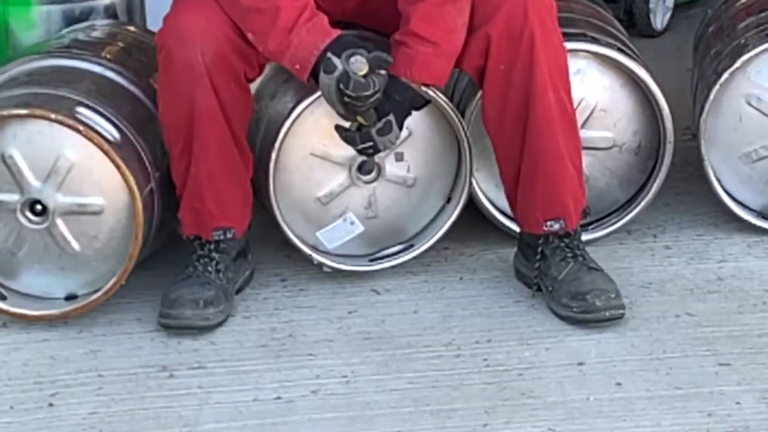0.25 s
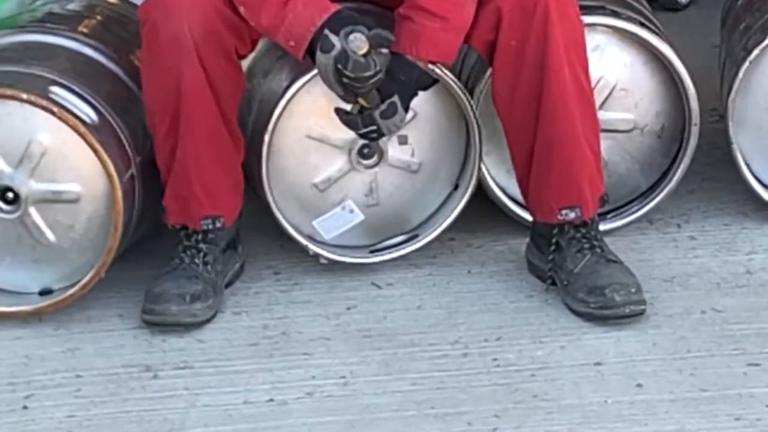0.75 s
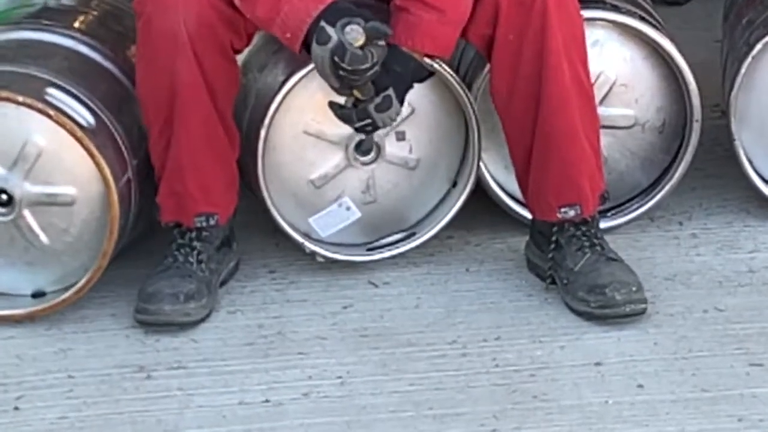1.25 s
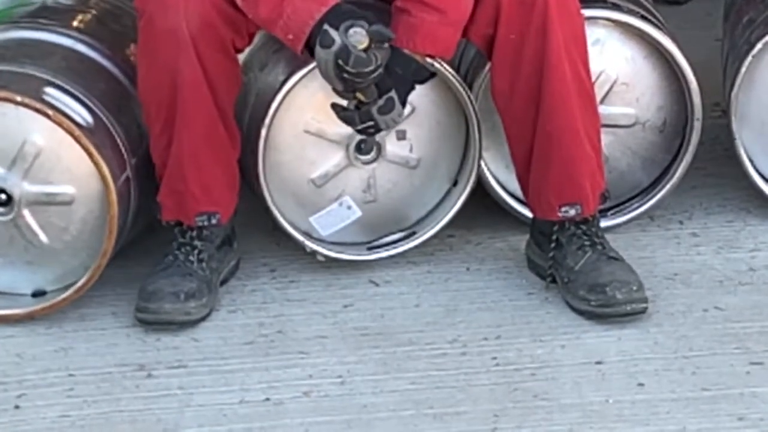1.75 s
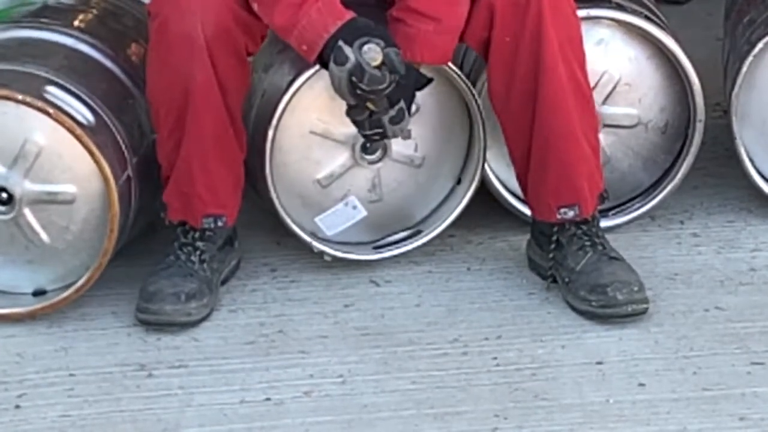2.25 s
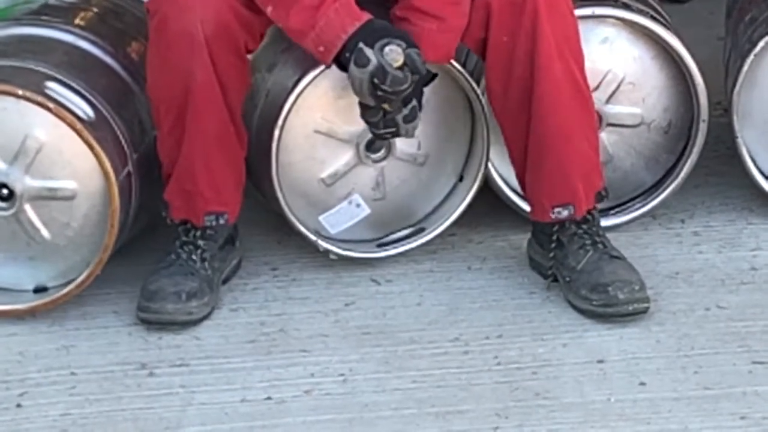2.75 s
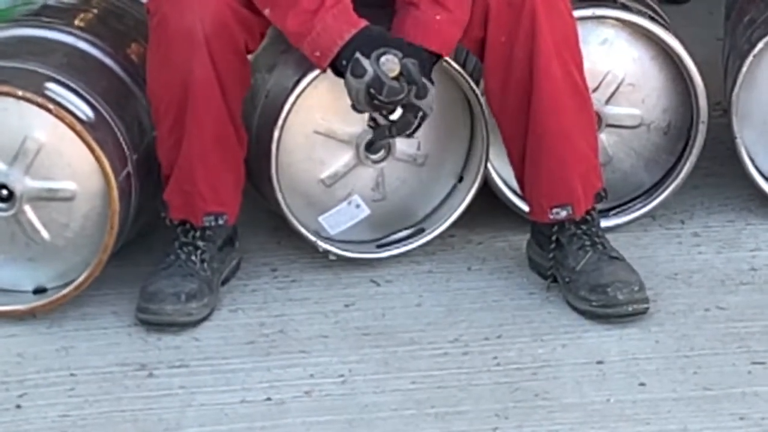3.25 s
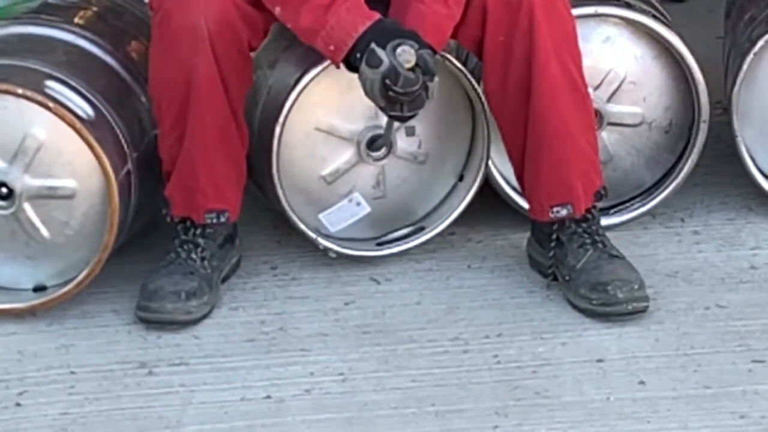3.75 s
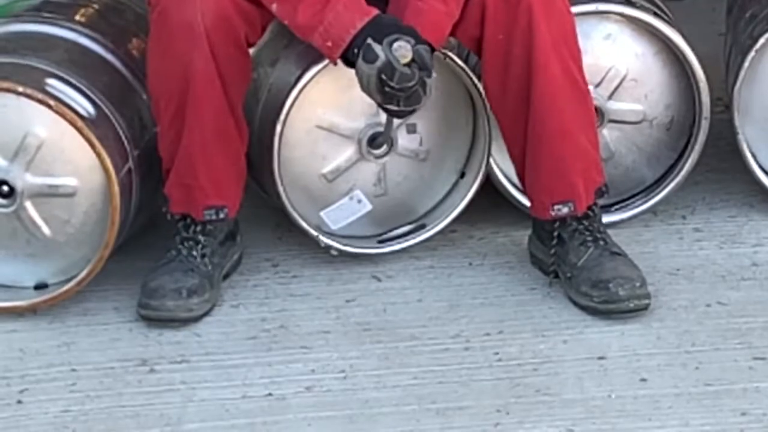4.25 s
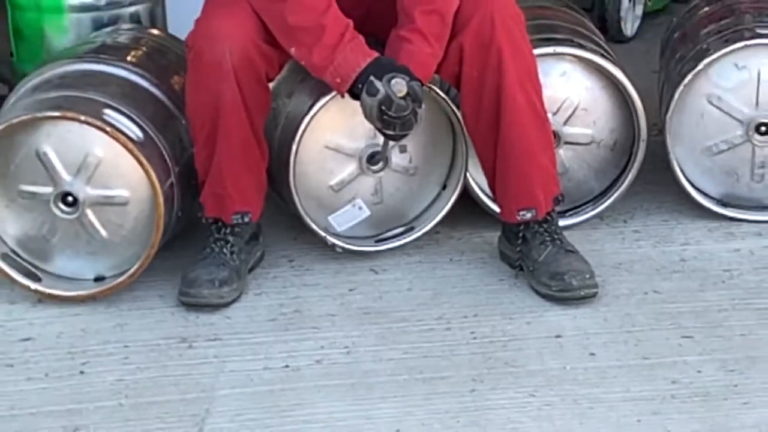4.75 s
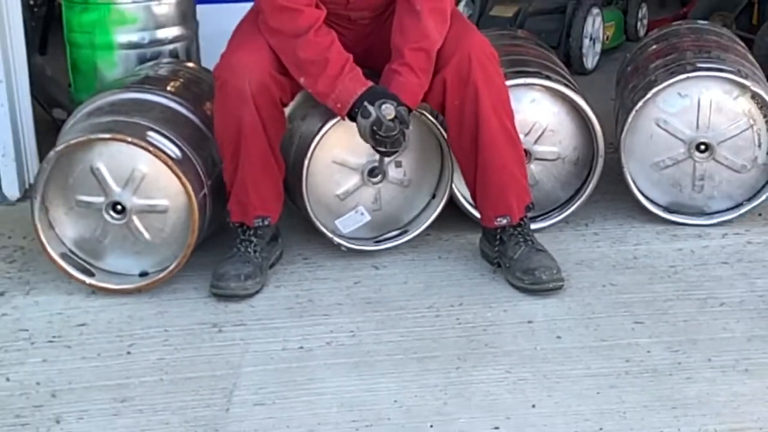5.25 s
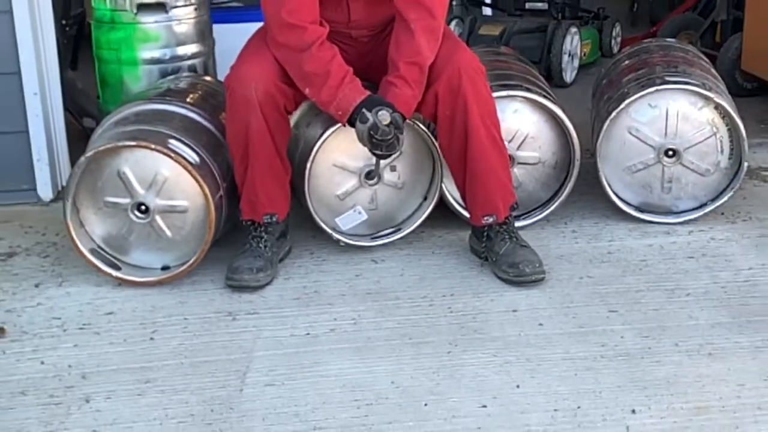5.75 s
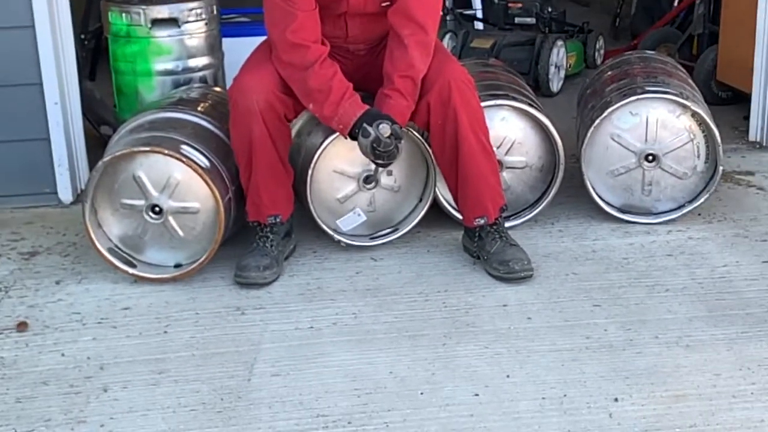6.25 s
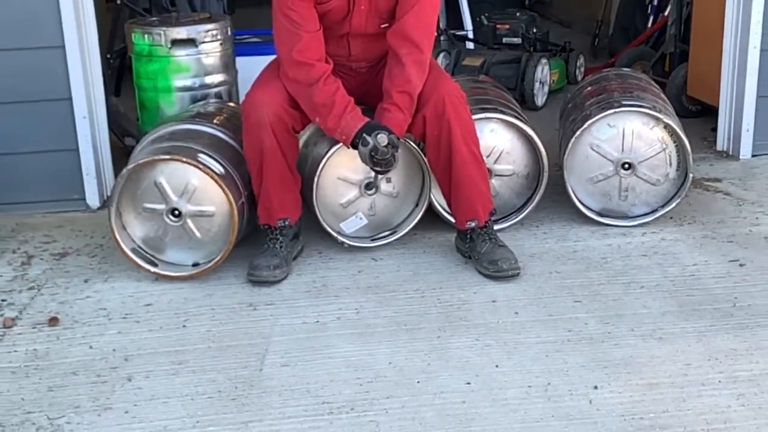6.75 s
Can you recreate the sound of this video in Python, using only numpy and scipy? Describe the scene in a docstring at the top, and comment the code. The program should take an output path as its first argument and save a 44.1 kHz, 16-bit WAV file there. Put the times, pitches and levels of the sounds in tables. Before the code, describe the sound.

A tool knocks on a steel keg valve and gas sputters, then bursts into a loud hiss that slowly fades.

```python
"""A tool knocks on the valve of a steel keg, over the low hum and rumble of a workshop yard.
Each blow rings the modes of the shell, and short puffs of gas escape. Then the valve stays open:
a turbulent jet hisses, coloured by the hollows of the rim and fading as the pressure runs out.
The hiss changes colour, slowly at first, then abruptly. A two-port microphone stands a few metres
away and takes a few soft bumps on its body."""
import sys
import numpy as np
from scipy import signal
from scipy.fft import rfft, irfft
from scipy.io import wavfile
from scipy.ndimage import uniform_filter1d

SR = 44100
rng = np.random.default_rng(int(sys.argv[2]) if len(sys.argv) > 2 else 0)


def persist_wave(psi):
    """Save psi, clipped to +-1, as 16-bit WAV."""
    counts = np.round(np.clip(psi, -1, 1) * 32767).astype(np.int16)
    wavfile.write(sys.argv[1], SR, np.atleast_2d(counts).T)


N = 308259
TIME = np.arange(N) / SR
AGE = np.arange(SR) / SR  # the second after an event starts
FREQ = np.arange(N // 2 + 1) * SR / N  # f/Hz of each spectral bin
OPENS_S, OPEN_RISE_S = 2.5115, 0.0082  # the valve opens and stays open


def gas():
    """Source and filter: turbulence makes broadband noise, and the resonances of the keg colour it."""
    # early and late hiss spectrum: f/Hz, spectral level/dB
    early_spectrum = [(200, -24.5), (380, -26), (760, -13.5), (1230, -27.5), (1900, -14.5), (4250, -4),
                      (5000, -12.5), (6100, -13), (6600, -2.5), (7700, -4.5), (9200, 1), (12000, -5),
                      (13800, -3.5), (15300, -5)]
    late_spectrum = [(200, -43), (380, -34.5), (760, -16), (1230, -26), (2100, -19), (4000, -9.5),
                     (5600, -25), (6600, -13), (7800, -13.5), (8150, -3.5), (9000, 1.5), (12000, -7),
                     (13800, -5.5), (15300, -6.5)]
    # the hiss changes colour, 4-8 kHz dropping abruptly at 5.24 s: t/s, share of the late spectrum (0-1)
    colour_change = [(2.5, 0), (3.05, 0), (3.15, .15), (3.9, .3), (5.2, .55), (5.24, 1), (6.7, 1),
                     (6.8, .8)]
    late, = curves(colour_change)
    flow_power = open_jet()
    puff_power = puffs()
    seep_power = np.array([[undb(-80.5) ** 2], [0]])  # faint steady leak, treble only
    treble, rim = np.sqrt(flow_power + puff_power + seal_burst() + seep_power)
    shell_drive = np.sqrt(puff_power[1])
    rim_top_hz = 5800
    low = 1 / (1 + (FREQ / rim_top_hz) ** 8)  # crossover from rim band to treble band
    spectra = []
    for noise in rng.standard_normal((2, N)):
        hiss = 0
        for colour, share in ((early_spectrum, 1 - late), (late_spectrum, late)):
            bands = low * rfft(noise * rim * share) + (1 - low) * rfft(noise * treble * share)
            hiss += shape(colour) * bands
        spectra.append(rim_response() * hiss + shell_response() * rfft(noise * shell_drive))
    return ports(*spectra)


def open_jet():
    """Jet noise weakens as the driving pressure falls. Returns power in the treble and rim bands."""
    # outflow of the open valve: t/s, jet level/dB, rim level/dB relative to the jet
    outflow = [(2.55, -20, -0.5), (2.66, -18, -3.5), (3.03, -18.5, -2.5), (3.09, -20.5, -3.5),
               (3.41, -23, -2.5), (3.88, -22, -4), (4.68, -25, -3.5), (4.86, -27, -2), (5.2, -27, -3),
               (5.44, -30.5, -1.5), (5.99, -29.5, -2), (6.1, -29, -2.5), (6.47, -35.5, 1),
               (6.94, -38.5, 1.5), (6.99, -42, 5)]
    # brief swells of the treble: t/s, lift/dB
    surges = [(3.51, 0.5), (3.93, 3.5), (4.7, 2.5), (5.12, 2.5), (6.06, 2), (6.4, 2)]
    jet_db, rim_db = curves(outflow)
    surge_db = sum(db * bell(s, 0.029) for s, db in surges) + 1.06 * walk(14)
    opening = np.clip((TIME - OPENS_S) / OPEN_RISE_S, 0, 1) ** 2
    flow = undb(jet_db + 0.53 * walk(9) + 0.51 * walk(120)) * opening
    return (flow * undb([surge_db, rim_db])) ** 2


def puffs():
    """Transient outflow: the seal snaps open, then leaks. Returns power in the treble and rim bands."""
    # escapes of gas: t/s, level/dB, relative rim level/dB, relative leak level/dB, slope/(dB per 0.1 s)
    escapes = [(0.2144, -62, 11, 2, -22), (0.372, -36.5, 1.5, 3, -21), (0.396, -27.5, 2.5, -5.5, -17),
               (0.6524, -61, 8, 9, -14), (0.699, -45.5, 8.5, -6, -21), (0.899, -58.5, 1, 1, -22),
               (1.094, -49, -2, 3, -22), (1.108, -39.5, 0, -0.5, -25), (1.224, -59, 8, -1, -22),
               (1.397, -45.5, 12, -11, -7), (1.476, -35, 2.5, 0, -21.5), (1.877, -49.5, 1, -1.5, -19),
               (1.981, -35, 7, 2.5, -15), (2.0347, -48, 3.5, -0.5, -16), (2.0994, -46, 5.5, 1, -8.5),
               (2.218, -23.5, 0, -10.5, -11), (2.2677, -16, 3.5, -9, -10.5), (2.4463, -23, 3.5, -8, -3),
               (2.461, -28, 7.5, -12, -21)]
    sputters = [(when * OPENS_S, -66 + 5 * (2 * size - 1), 4, 1.5, -20)
                for when, size in rng.random((7, 2))]  # faint puffs at random moments
    crest_db = 10  # noise peaks stand above the envelope
    power = np.zeros((2, N))
    for s, db, rim_db, leak_db, slope_db in escapes + sputters:
        leak = undb(leak_db + slope_db * AGE / 0.1) * (1 - np.exp(-AGE / 0.003))
        puff = undb(db - crest_db) * (fall(t60=0.054, rise_s=0.00044) + leak)
        add(power[0], s, puff ** 2)
        add(power[1], s, (puff * undb(rim_db)) ** 2)
    return power


def seal_burst():
    """Sudden pressure release as the seal gives way. Returns power in the treble and rim bands."""
    burst = undb(-4) * fall(t60=0.19, rise_s=OPEN_RISE_S) * np.clip(AGE / OPEN_RISE_S, 0, 1)
    power = np.zeros((2, N))
    add(power[0], OPENS_S, burst ** 2)
    add(power[1], OPENS_S, (burst * undb(-5)) ** 2)
    return power


def rim_response():
    """Cavity resonance: the hollows of the rim ring with the jet and cancel it in between."""
    # peaks and notches: f/Hz, width/Hz, gain/dB
    hollows = [(1420, 98, 10.5), (1864, 150, 4.5), (2094, 93, 10), (2357, 99, -9), (2392, 90, 12.5),
               (2590, 52, -14), (3075, 79, 9), (3034, 62, -20), (3090, 640, 2.5), (3390, 53, -22),
               (3400, 95, 2.5), (4120, 79, 0), (4720, 480, 4), (6430, 26, 6), (5900, 110, 6.5),
               (6720, 26, 8.5), (7000, 43, 5.5), (6850, 89, -5.5), (7200, 72, -9.5)]
    return undb(sum(db / (1 + (2 * (FREQ - hz) / width) ** 2) for hz, width, db in hollows))


def shell_response():
    """Sympathetic vibration: the shell sings in narrow bands along with the puffs."""
    # shell resonances: f/Hz, width/Hz, level/dB
    resonances = [(1122, 34, -22.5), (1380, 80, -20.5), (3320, 37, -24), (4120, 90, -25.5)]
    return sum(undb(db) * shape([(1, -80), (hz - 3 * width, -30), (hz - width / 2, -3),
                                 (hz + width / 2, -3), (hz + 3 * width, -30), (SR, -80)])
               for hz, width, db in resonances)


def knocks():
    """Impact excitation: a thud, the damped modes of the keg, a crack and a rattle between the kegs."""
    # tool on the valve: t/s, level/dB, thud f/Hz, relative clank level/dB
    blows = [(0.174, -39, 535, -3), (0.667, -34.5, 258, -5.5), (1.375, -24, 197, -13.5),
             (1.602, -37, 504, -5.5), (2.039, -32, 180, -10)]
    # modes of the keg: f/Hz, level/dB, T60/s
    modes = [(283, 0.5, 0.17), (362, -6, 0.12), (488, -4, 0.3), (637, -17, 0.065), (1324, -11, 0.31),
             (1900, -14, 0.28), (2523, -20.5, 0.71), (3320, -13, 0.13), (3600, -35, 0.083),
             (4100, -11, 0.055)]
    tones, rattle = np.zeros((2, N))
    scatter = rng.standard_normal((len(blows), 2, len(modes)))
    rattle_decay = fall(t60=0.029, rise_s=0.00039) + undb(-6.5) * fall(0.46) + undb(-24) * fall(1.2)
    for (s, db, thud_hz, clank_db), (sizes, detunes) in zip(blows, scatter):
        add(tones, s, undb(db) * fall(t60=0.04, rise_s=0.00084) * sine(thud_hz))
        for (hz, mode_db, t60), size, detune in zip(modes, sizes, detunes):
            # the dented shell splits every mode into a beating pair
            pair = sum(sine(hz * (1 + split + 0.012 * detune)) for split in (-0.012, 0.012)) / 2
            add(tones, s, undb(db + clank_db + mode_db + 3 * size) * fall(t60, rise_s=0.0004) * pair)
        add(rattle, s - 0.001, undb(db + clank_db - 3.5) * rattle_decay)
    colour = shape([(200, -6), (600, 18), (1500, -4), (3500, 2.5), (5200, -18), (12000, -28)])
    direct, stray = (colour * rfft(rattle * noise) for noise in rng.standard_normal((2, N)))
    return ports(rfft(tones) + direct, rfft(tones) + stray)


def bumps():
    """Structure-borne sound: damped swings of the microphone housing and a scuff, alike in both ports."""
    # soft bumps on the housing: t/s, level/dB, f/Hz, T60/s
    touches = [(4.2, -55, 70, 0.15), (4.597, -56, 69.5, 0.2), (4.986, -49.5, 70, 0.2),
               (5.061, -48, 72, 0.14), (5.508, -55, 70, 0.2), (5.625, -48, 72, 0.15),
               (5.7, -54, 70.4, 0.24), (5.789, -51, 70, 0.15), (6, -46.5, 70, 0.15), (6.261, -58, 71, 0.31),
               (6.949, -55, 70, 0.2)]
    swings, scuff = np.zeros((2, N))
    for s, db, hz, t60 in touches:
        add(swings, s, undb(db) * fall(t60, rise_s=0.0015) * sine(hz))
        add(scuff, s, undb(db - 4) * fall(t60=0.14, rise_s=0.00088))
    colour = shape([(50, -20), (120, 6), (300, -5.5), (450, -38), (1200, -88)])
    return swings + irfft(colour * rfft(scuff * rng.standard_normal(N)), N)


def yard():
    """Ambient field of rumble, rush and hum; the noise is coherent left and right only in the bass."""
    # low rumble and broad rush: f/Hz, spectral level/dB
    rumble_spectrum = [(22, -30), (40, -11), (52, -3), (63, 0), (78, -3), (92, -14), (125, -36),
                       (250, -130)]
    rush_spectrum = [(90, 3), (140, 0.5), (210, -0.5), (330, -12), (610, -17.5), (950, -19.5), (1500, -24),
                     (2200, -32.5), (2900, -36), (5000, -46.5)]
    # the yard sinks away once the jet blows and creeps back: t/s, gain/dB
    sinking = [(2.54, 2), (2.61, -19), (3.1, -33), (4.85, -31.5), (5.3, -24.5), (6.99, -20)]
    # swells of the rumble: t/s, lift/dB, half length/s
    swells = [(.17, 3, .05), (0.391, 13, 0.029), (0.618, 13.5, 0.025), (0.673, 8, .025), (1.04, 11.5, .06),
              (2.525, 8, 0.027), (5.092, 21, 0.062)]
    sink_db, = curves(sinking)
    apart = np.clip(0.19 + FREQ / 1300, 0, 1) * np.array([[1], [-1]])
    rumble_noise, rush_noise = (mid + apart * side for mid, side in rfft(rng.standard_normal((2, 2, N))))
    rumble = irfft(shape(rumble_spectrum) * rumble_noise, N)
    rush = irfft(shape(rush_spectrum + [(9000, -80)]) * rush_noise, N)  # distance takes the treble away
    # dividing by the running rms evens out the rumble
    rumble /= np.sqrt(0.05 + uniform_filter1d(rumble.mean(axis=0) ** 2, size=SR // 20))
    swell_db = sum(db * bell(s, half_s) for s, db, half_s in swells)
    drone = hum() * undb(0.17 * sink_db)  # the hum sinks further than the rest
    rumble *= undb(-50 + swell_db + 2.6 * walk(14))
    rush *= undb(-47.5 + 0.77 * walk(6.1))
    return undb(sink_db) * (rumble + drone + rush)


def hum():
    """Random modulation of frequency and amplitude makes a low tone waver."""
    # the hum comes and goes: t/s, level/dB
    levels = [(0.0, -85), (0.07, -53), (0.17, -41.5), (0.36, -55.5), (0.46, -43), (0.7, -50), (0.72, -42.5),
              (1.11, -43), (1.19, -58), (1.28, -45.5), (1.78, -59), (1.81, -45), (2.05, -51), (2.16, -44),
              (2.48, -57.5), (2.5, -48.5)]
    level_db, = curves(levels)
    centre_hz, waver_hz = 110, 5.28
    phase = 2 * np.pi * np.cumsum(centre_hz + waver_hz * walk(14)) / SR
    port_phase = np.array([[0.3], [-0.3]]) * walk(6)
    return np.sqrt(2) * np.sin(phase + port_phase) * undb(level_db + 2 * walk(20))


def ports(direct, stray):
    """Partial coherence: left hears the direct spectrum, right a phase-shifted copy plus stray sound."""
    # right port against left: f/Hz, phase lead/rad, coherence (0-1), level/dB
    transfer = [(0, 0, .97, -.5), (1700, -.2, .85, -1), (2300, -1.2, .55, 0), (3800, -1.3, .55, -1),
                (4150, 0, .95, -1), (4550, -.1, .92, 1), (4950, -2.6, .5, 8), (5700, -3.3, .5, 7),
                (6050, -6.3, .9, 3), (7300, -5.8, .85, -1), (7600, -4.6, .6, -2), (7900, -3.6, .95, 0),
                (8300, -3.2, .99, 0), (8600, -3.1, .995, 0), (9500, -1.85, .93, 0), (10950, 0, .99, 0),
                (12200, 1.6, .88, 0), (13400, 3.14, .995, 0), (14600, 4.7, .88, 0), (15850, 6.28, .99, 0)]
    lead, coherence, db = curves(transfer, axis=FREQ)
    right = undb(db) * (coherence * np.exp(1j * lead) * direct + np.sqrt(1 - coherence ** 2) * stray)
    return irfft(np.array([direct, right]), N)


def undb(db):
    """Amplitude ratio from dB."""
    return 10 ** (np.asarray(db) / 20)


def shape(points):
    """Gain per bin from (f/Hz, level/dB) points, scaled to conserve the power of white noise."""
    hz, db = np.transpose(points)
    gain = undb(np.interp(np.log(FREQ + 1), np.log(hz), db))
    return gain / np.sqrt(np.mean(gain ** 2))


def curves(rows, axis=TIME):
    """Linear interpolation of each further column against the first."""
    knots, *columns = np.transpose(rows)
    return [np.interp(axis, knots, column) for column in columns]


def fall(t60, rise_s=0.00091):
    """Quick rise, then exponential decay by 60 dB in t60 seconds."""
    return (1 - np.exp(-AGE / rise_s)) * np.exp(-np.log(1000) * AGE / t60)


def sine(hz):
    """One second of simple harmonic motion."""
    return np.sin(2 * np.pi * hz * AGE)


def bell(s, half_s):
    """Gaussian pulse centred on time s."""
    return np.exp(-((TIME - s) / half_s) ** 2)


def walk(rate_hz):
    """Slow fluctuation: random steps smoothed twice, with a spread near 1."""
    hold = int(SR / rate_hz)
    steps = np.repeat(rng.standard_normal(N // hold + 1), hold)
    return 1.3 * uniform_filter1d(uniform_filter1d(steps, hold), hold)[:N]


def add(track, s, sound):
    """Mix a sound into a track from time s."""
    start = int(s * SR)
    track[start:start + len(sound)] += sound[:N - start]


def scene():
    """Superposition of all sources at the two ports."""
    return gas() + knocks() + bumps() + yard()


def record(dry):
    """Soft saturation rounds the loudest peaks, and a steep low-pass cuts the top."""
    top_hz = 15740
    return signal.sosfilt(signal.ellip(16, 0.3, 80, top_hz, fs=SR, output="sos"), np.tanh(dry))


dry = scene()
out = record(dry)
persist_wave(out)
```